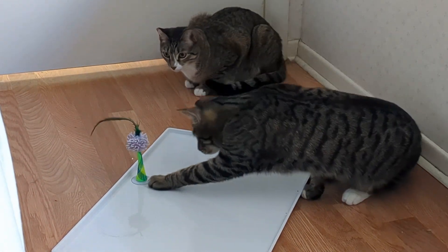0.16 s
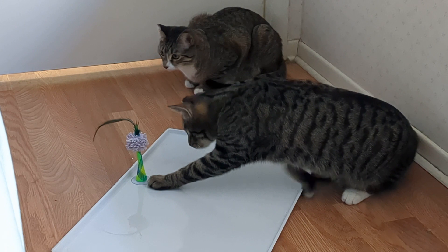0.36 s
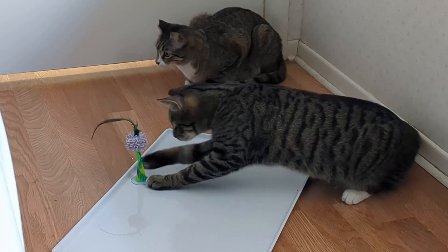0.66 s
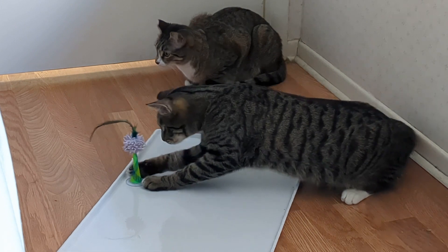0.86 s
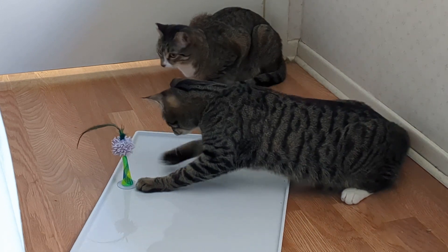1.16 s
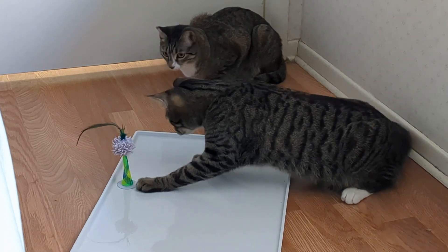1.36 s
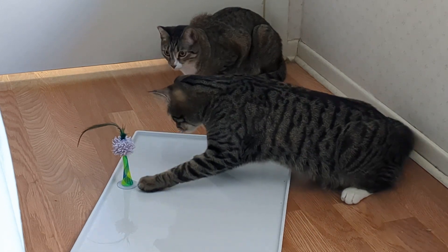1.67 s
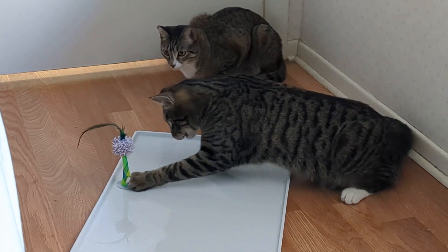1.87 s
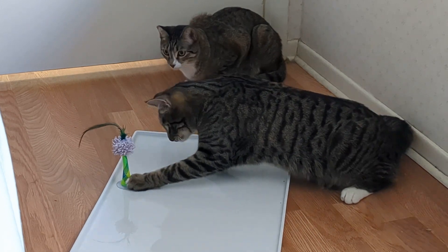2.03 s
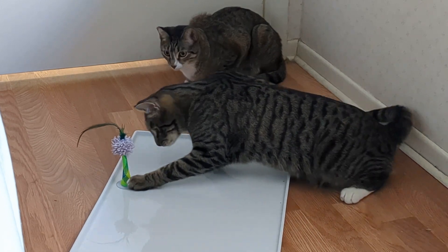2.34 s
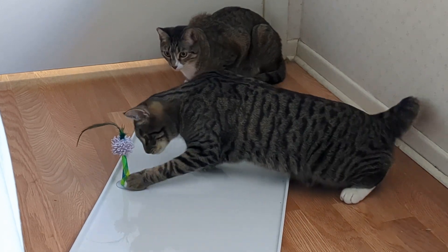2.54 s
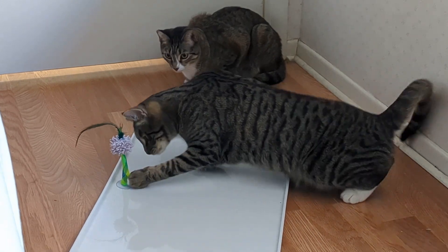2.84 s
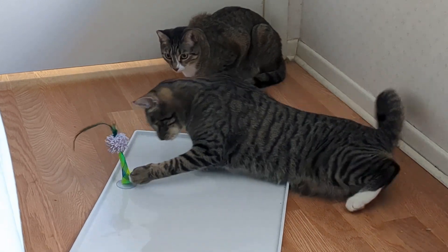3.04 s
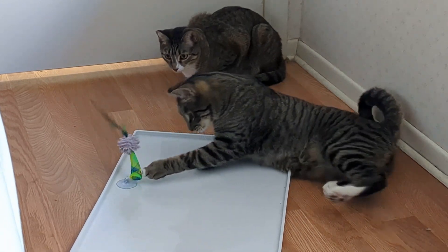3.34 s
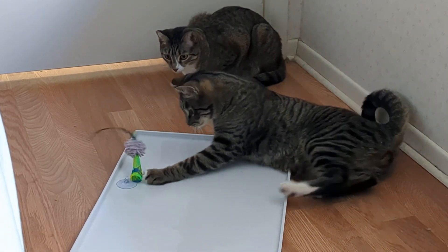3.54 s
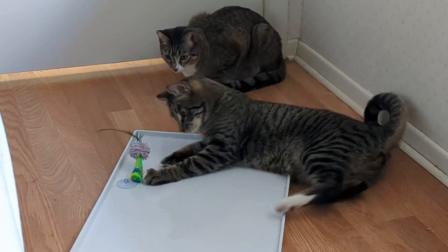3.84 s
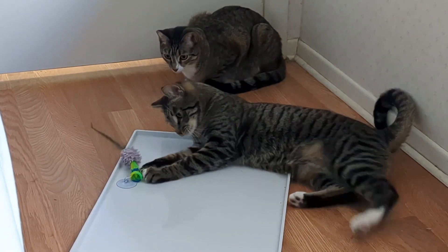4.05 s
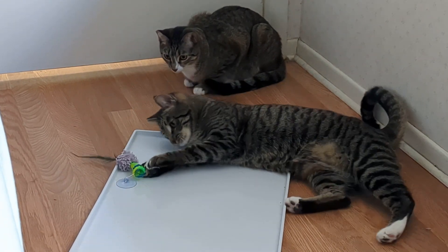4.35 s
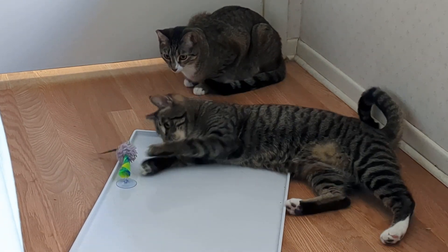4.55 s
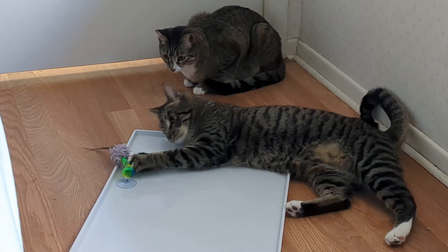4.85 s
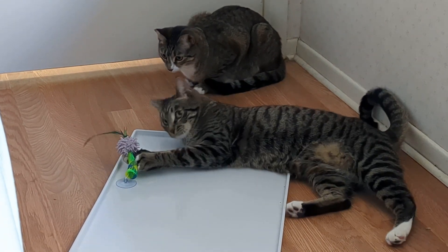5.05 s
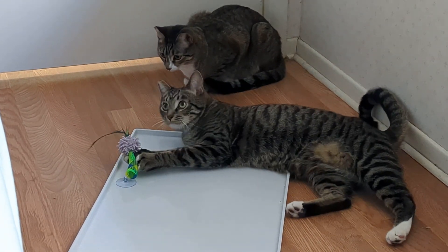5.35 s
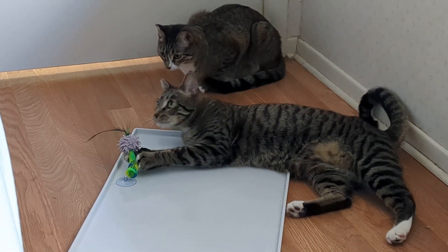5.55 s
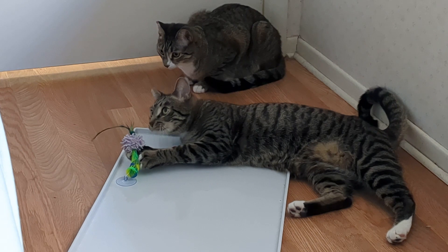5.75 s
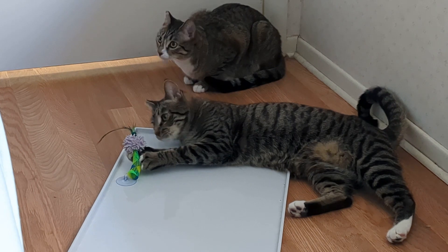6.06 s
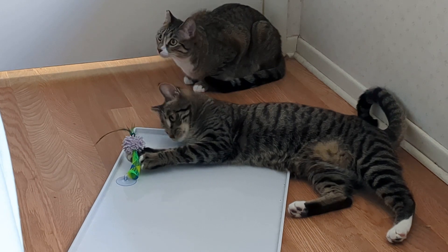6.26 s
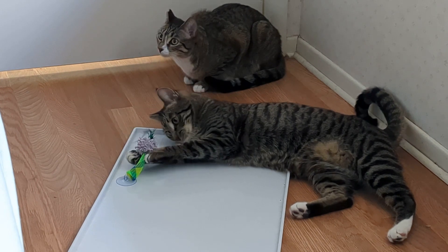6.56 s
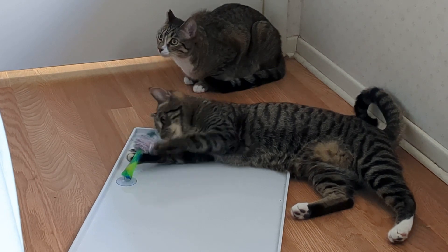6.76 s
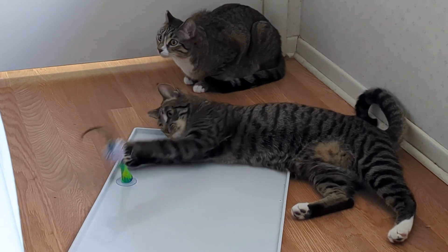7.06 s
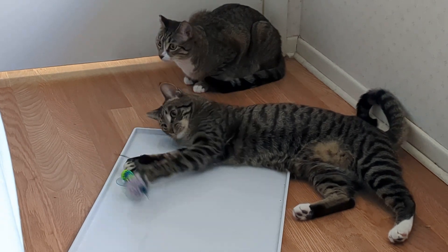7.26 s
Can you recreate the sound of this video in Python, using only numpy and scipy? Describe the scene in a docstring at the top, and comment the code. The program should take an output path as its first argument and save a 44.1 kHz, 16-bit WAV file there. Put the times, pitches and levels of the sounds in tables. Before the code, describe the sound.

Steady low room rumble with a very faint hiss runs throughout, picked up close in stereo in a small hard room. From 0.1 to 0.4 s a paw scratches lightly over thin plastic with a faint low squeal gliding upward; a second, grittier drag lasts from 0.6 to 1.25 s, with a tick and tiny ping near 1.0. Swipes and ticks at 1.4 and 1.66 lead to a crisp, modest snap at 1.72 over a soft deep thud. A faint rustle swells around 2.1. At 3.02-3.22 s claw ticks, swipes and dull bumps cluster with faint fur brushing, then the toy snaps three times almost as one at 3.34, loudest of all, briefly ringing the tray. Small ticks continue to 4.0, faint patter at 4.2, a soft bump at 4.45. Rustles swell softly near 3.75 and 4.75. Sparse dull touches follow at 5.36, 5.9, 6.4, 6.8 and barely at 7.27.

```python
"""A cat plays with a springy toy on a plastic tray in a small, hard-walled room, with rumble and hiss throughout.
First a paw drags over the tray twice (tiny slips, shaped noise) with a faint squeal (a gliding sine) at the start.
Then a deep thud swells (a sine) and the toy snaps (a noise crack and ringing tray); later it snaps three times fast.
Ticks, swipes (short noise), bumps (soft noise and tray flex) and stem pings (dying sines) run through the play.
Three soft rustles swell (smooth noise), fur brushes the tray (grains), and the last light touches thin out."""
import sys
import numpy as np
from scipy import signal
from scipy.fft import rfft, irfft
from scipy.io import wavfile
from scipy.ndimage import uniform_filter1d

SR = 44100
rng = np.random.default_rng(int(sys.argv[2]) if len(sys.argv) > 2 else 0)


def materialize(psi):
    """Save the field psi as 16-bit PCM at rate SR to the path in sys.argv[1].

    A 1-D psi becomes a single channel; in a 2-D psi each row is a channel.
    """
    bounded = np.clip(np.atleast_2d(psi).T, -1, 1)
    quanta = np.round(bounded * 32767).astype(np.int16)
    wavfile.write(sys.argv[1], SR, quanta)


N = 326600
TIME = np.arange(N) / SR


def from_db(db):
    """Turn decibels into a gain."""
    return 10 ** (np.asarray(db) / 20)


def rms_one(x):
    """Scale a sound to unit power."""
    return x / np.sqrt(np.mean(x ** 2) + 1e-30)


def in_time(rows):
    """Draw each column of a curve as a value at every sample."""
    s, *columns = np.transpose(rows)
    return [np.interp(TIME, s, column) for column in columns]


def during(rows):
    """One while a curve lasts, zero outside, with 20 ms ramps at the ends."""
    since_start = TIME - rows[0][0]
    until_end = rows[-1][0] - TIME
    return np.clip(np.minimum(since_start, until_end) / 0.02, 0, 1)


def rise_and_fade(peak_s, rise_db_per_s, fade_db_per_s):
    """A level in dB that climbs to zero and sinks again."""
    return np.minimum((TIME - peak_s) * rise_db_per_s, (peak_s - TIME) * fade_db_per_s)


def at_hz(points, hz):
    """Read a curve between its points on a log-frequency axis."""
    f, value = np.transpose(points)
    return np.interp(np.log(hz + 1e-9), np.log(f), value)


def colour(x, points, size=2048):
    """Filter with the given (f/Hz, level/dB) curve, causally (minimum phase, so nothing sounds early)."""
    gain = from_db(at_hz(points, np.fft.rfftfreq(size, 1 / SR)))
    cepstrum = irfft(np.log(gain))
    # fold the cepstrum onto positive time: this makes the phase minimal
    cepstrum[1:size // 2] *= 2
    cepstrum[size // 2 + 1:] = 0
    response = irfft(np.exp(rfft(cepstrum)))
    return signal.oaconvolve(x, response)[:N]


def noise(points):
    """Steady noise of a given colour, unit power."""
    return rms_one(colour(rng.standard_normal(N), points, size=8192))


def ring(x, hz, t60):
    """One vibration: a unit click starts a dying sine of height 1 (t60: seconds to fall 60 dB)."""
    r = np.exp(-np.log(1000) / (t60 * SR))
    w = 2 * np.pi * hz / SR
    return signal.lfilter([0, np.sin(w)], [1, -2 * r * np.cos(w), r * r], x + 1e-18)


def add(out, s, sound):
    """Mix a sound in at time s."""
    i = int(s * SR)
    out[i:i + len(sound)] += sound[:N - i]


def burst(t60, crack=0., rise_s=1e-5, size=6000, count=4):
    """A contact of unit energy: a sharp crack or a soft rise, then dying chatter with no pitch of its own."""
    t = np.arange(size) / SR
    chatter = np.exp(-np.log(1000) * t / max(t60, 1e-3)) * (1 - np.exp(-t / rise_s))
    envelope = chatter + crack * np.exp(-t / 0.00023)
    x = rng.standard_normal(size) * envelope
    for _ in range(count):  # even out the spectrum, then restore the decay
        x = irfft(np.exp(1j * np.angle(rfft(x))), size)
        x *= envelope / np.sqrt(np.abs(uniform_filter1d(x ** 2, size=24)) + 1e-12)
    return x / np.sqrt(np.sum(x ** 2))


def grains(per_s, spread_db):
    """Tiny stick-slip releases of uneven size at random moments, unit power."""
    sizes = from_db(spread_db * np.minimum(rng.exponential(1, N), 4))
    signs = rng.choice([-1, 1], N)
    happens = rng.random(N) < per_s / SR
    return rms_one(sizes * signs * happens)


def contacts(rows, body, gain_db, crack, rise_s):
    """Touches, each with its own brightness, sounding through the thin plastic."""
    out = np.zeros(N)
    for s, level_db, low_db, presence_db, treble_db, t60 in rows:
        brightness = [(2000, low_db), (4000, presence_db), (5000, presence_db), (9000, treble_db)]
        hit = colour(burst(t60, crack, rise_s), brightness)
        add(out, s, from_db(level_db + gain_db) * hit)
    return colour(out, body)


def touch(s, level_db, brightness_db, t60, presence_db):
    """A contact with a tipped spectrum: a claw tip favours the treble, a soft pad the low-mids."""
    return s, level_db, -brightness_db / 2, presence_db, brightness_db / 2, t60


# In the tables of touches and drags, level/dB is relative: each source adds its own gain.
# the toy snaps against the tray: [t/s, level/dB, low-mid level/dB, presence level/dB, treble level/dB, t60/s]
SNAPS = [(1.7236, -18, -6, -10, -14, 0.017), (3.336, -3, -12, -16, -20.5, 0.025),
         (3.3479, -5, -6.5, -11, -16.5, 0.01), (3.3614, -15.5, -23, -23.5, -14.5, 0.013)]
# thin plastic gives little bass: [f/Hz, level/dB]
SNAP_COLOUR = [(200, -34), (950, -19.5), (1280, -11), (1580, 1), (1930, 1.5), (2200, -1), (2500, 3.5),
               (3300, 3), (4800, 1), (5300, -5), (7000, -4.5), (9300, -1), (12500, -8), (16000, -7.5)]


def snaps():
    """The toy hits the tray: a sharp crack with short chatter."""
    return contacts(SNAPS, SNAP_COLOUR, gain_db=27, crack=0.77, rise_s=0.00021)


# how the tray rings when left free: [f/Hz, level/dB, t60/s before damping]
TRAY = [(1400, -16.5, 0.45), (1620, -4, 0.24), (1940, 1, 0.18), (2590, -9, 0.15), (3400, -5.5, 0.11),
        (3509, -19, 0.28), (4020, -3, 0.14), (4230, 3, 0.19), (4730, -6, 0.4), (5030, -12, 0.26),
        (5400, -18.5, 0.24), (5800, -2.5, 0.074), (5860, -11.5, 0.23), (6030, -17.5, 0.26),
        (6520, -6.5, 0.2), (6530, -12.5, 0.19), (7800, -12.5, 0.16), (7330, -15.5, 0.19),
        (9340, -19.5, 0.37), (9300, -19, 0.16)]


def tray(ring_db, damping):
    """Each snap sets the tray's vibrations ringing; the cat's weight makes them die sooner."""
    kicks = np.zeros(N)
    for s, level_db, *_ in SNAPS:
        add(kicks, s, from_db([level_db + ring_db]))
    out = 0
    for k, (hz, db, t60) in enumerate(TRAY):
        sign = (-1) ** k
        out = out + sign * from_db(db) * ring(kicks, hz, t60 / damping)
    return out


# faint, dull taps while the paw holds the toy down
PATTER_START_S, PATTER_GAP_S = 4.202, 0.042
PATTER_DB, PATTER_BRIGHTNESS_DB = -59.5, -15


def patter(spread_db, count=4):
    """A run of faint taps, uneven in time and strength, as rows of (t/s, level/dB, brightness/dB)."""
    rows = []
    for k, (late, strong) in enumerate(rng.uniform(-1, 1, (count, 2))):
        s = PATTER_START_S + PATTER_GAP_S * (k + late / 10)
        rows.append((s, PATTER_DB + spread_db * strong, PATTER_BRIGHTNESS_DB))
    return rows


# claws tick on toy and tray: [t/s, level/dB, brightness/dB (treble against low-mids)]
TICKS = [(0.175, -53, -13), (0.5304, -53, 6), (0.9917, -43, -1), (1.3902, -44.5, 2), (1.5297, -58, -8.5),
         (1.6596, -46, -2), (1.8227, -47.5, -5), (3.022, -47, -7), (3.035, -39.5, -4.5),
         (3.0738, -42.5, -8), (3.1259, -45.5, -5.5), (3.1539, -51.5, 4), (3.1805, -37.5, 10),
         (3.2146, -34, 10.5), (3.51, -47.5, -7), (3.6087, -57.5, -3), (3.6498, -42.5, 2), (3.676, -47.5, 6),
         (3.7851, -46, 8.5), (3.829, -52.5, 6), (3.897, -52, 2), (3.9436, -51, -5.5), (4.0257, -56, 7),
         (4.53, -56, 2), (4.6444, -55.5, 0.5), (5.3563, -62.5, -15.5), (5.9055, -56, -17)]
# the tone of claw ticks on thin plastic, strongest around 3 kHz: [f/Hz, level/dB]
TICK_COLOUR = [(200, -27), (1000, -17.5), (1600, -6.5), (2100, -3), (2600, 3), (3200, 4), (4700, 0),
               (5600, -3.5), (9300, -1.5), (12500, -9.5), (16000, -12)]
TICK_T60_S = 0.018  # every claw chatters equally briefly


def ticks():
    """Hard claw tips strike the plastic: small cracks with very short chatter."""
    claws = [touch(*tick, TICK_T60_S, presence_db=4) for tick in [*TICKS, *patter(spread_db=2)]]
    return contacts(claws, TICK_COLOUR, gain_db=25, crack=0.87, rise_s=0.00027)


# some touches pluck the toy's stem: [t/s, level/dB, f/Hz]
PINGS = [(1.063, -34.5, 2890), (3.023, -32.5, 2760), (3.897, -48, 4900), (3.9434, -52, 2890),
         (5.3546, -46.5, 2493)]


def stem(gain_db, t60):
    """Each pluck pings briefly at a pitch that depends on where the paw holds the stem."""
    out = np.zeros(N)
    for s, level_db, hz in PINGS:
        add(out, s, from_db(level_db + gain_db) * ring(signal.unit_impulse(SR // 4), hz, t60))
    return out


# soft pads and the toy's foot bump the tray: [t/s, level/dB, f/Hz]
BUMPS = [(1.728, -50.5, 620), (3.03, -54.5, 700), (3.182, -39, 630), (3.215, -37, 758.8),
         (3.343, -36, 1099), (3.359, -35, 760), (3.65, -56, 755), (4.458, -48.5, 1190), (5.903, -45.5, 554),
         (6.409, -60, 560), (6.794, -52, 517.6), (7.27, -58, 480)]
# the dull tone of a bump: [f/Hz, level/dB]
BUMP_COLOUR = [(150, -23), (300, -5.5), (430, -2), (700, 2), (1000, -1), (1400, -2), (2200, -6),
               (5000, -33.5)]
# the whole tray flexes under a soft push: [f/Hz, level/dB, t60/s]
TRAY_FLEX = [(444, -1, 0.14), (539, 1, .07), (611.7, -1.5, 0.069), (1108, -7, 0.054)]


def bumps(gain_db, t60, focus_db, flex_db):
    """Soft, dull pushes on the tray, each strongest around its own pitch; they also make it flex."""
    out, kicks = np.zeros(N), np.zeros(N)
    for s, level_db, hz in BUMPS:
        focus = [(hz / 2, -focus_db), (hz, 0), (2 * hz, -focus_db)]
        push = colour(burst(t60, rise_s=0.001), focus)
        add(out, s, from_db(level_db + gain_db) * push)
        kick = colour(signal.unit_impulse(SR // 10), focus)
        add(kicks, s, from_db(level_db + flex_db) * kick)
    flex = sum(from_db(db) * ring(kicks, hz, decay) for hz, db, decay in TRAY_FLEX)
    return colour(out, BUMP_COLOUR) + flex


# short swipes of a paw: [t/s, level/dB, brightness/dB (treble against low-mids), t60/s]
SWIPES = [(0.464, -62, 7, 0.094), (0.5182, -55.5, 14, 0.15), (0.9947, -47.5, -8, 0.031),
          (1.3516, -53, 0.5, .09), (1.3897, -45.5, -2.5, .053), (1.6652, -46, -1, 0.21),
          (2.758, -71, 5, .053), (3.084, -46, -1, 0.031), (3.177, -36.5, -8, 0.075), (3.22, -41, -2, .07),
          (3.6377, -45.5, 7.5, 0.043), (4.1347, -60, -2, 0.082), (4.3718, -58.5, 19, 0.031),
          (4.452, -51, 11, 0.027), (5.6312, -68, -15.5, .053), (5.8684, -67.5, -2, .053),
          (5.9, -57.5, -11, .02), (6.301, -70.5, 0, .052), (6.4076, -62, -3.5, 0.045),
          (6.7706, -53.5, 9.5, 0.025)]
# the plastic under a swipe: [f/Hz, level/dB]
SWIPE_COLOUR = [(200, -23.5), (1000, -13), (1500, -1.5), (2000, 3.5), (2600, 6), (4500, -0.5), (5600, -4),
                (6600, 0.5), (7900, -9.5), (9300, -1.5), (12500, -10), (16000, -14.5)]


def swipes():
    """A paw brushes past: a burst of noise with a soft rise and no crack."""
    paws = [touch(*swipe, presence_db=1.5) for swipe in SWIPES]
    return contacts(paws, SWIPE_COLOUR, gain_db=28.5, crack=0, rise_s=0.004)


def uneven(depth_db, span_s):
    """The gain of a paw that catches and slips: a smooth random wobble."""
    window = np.hanning(int(span_s * SR))
    wobble = signal.oaconvolve(rng.standard_normal(N), window, "same")
    return from_db(depth_db * rms_one(wobble))


# a paw drags over the tray twice, one curve each: [t/s, claw scratch level/dB, pad rub level/dB]
DRAG = [
    [(0.11, -78, -86), (0.2, -53, -75), (0.24, -69, -82), (0.278, -49.5, -93), (0.34, -61, -82),
     (0.42, -106, -88)],
    [(0.6, -66, -81), (0.67, -50.5, -82), (0.73, -55.5, -76), (0.78, -49, -69.5), (0.93, -56.5, -56.5),
     (1.04, -59, -70.5), (1.085, -53.5, -59.5), (1.135, -59.5, -73), (1.27, -67, -74)],
]
# the tone of scratching claws or fur: [f/Hz, level/dB]
SCRATCH_COLOUR = [(1350, -28), (2300, -13.5), (2790, -5), (3340, -3.5), (4330, -0.5), (5480, -3.5),
                  (6450, -3), (7960, -10.5), (8920, -3.5), (15100, -18.5), (16000, -23.5)]
# the tone of a gripping paw: [f/Hz, level/dB]
GRIP_COLOUR = [(900, -32), (1400, -12), (1900, -5.5), (2500, -0.5), (3000, -2.5), (4500, -19)]
# the tone of a rubbing pad: [f/Hz, level/dB]
PAD_COLOUR = [(300, -16), (480, 2), (650, 3.5), (800, 1), (950, -20), (1200, 1.5), (1600, -12), (3000, -40)]
GRIP_FOLLOWS_PAD = 0.55  # share of the grip's dB level set by the pad's pressure, the rest by the claws


def drag(scratch_gain_db, grip_gain_db, pad_gain_db):
    """Claws scratch in fine grains; a pressed paw grips in coarser slips and its pad rubs low."""
    scratch = rms_one(colour(grains(per_s=9800, spread_db=2), SCRATCH_COLOUR))
    grip = rms_one(colour(grains(per_s=3000, spread_db=2), GRIP_COLOUR))
    pad = rms_one(colour(grains(per_s=1500, spread_db=1.5), PAD_COLOUR))
    out = 0
    for stroke in DRAG:
        scratch_db, pad_db = in_time(stroke)
        grip_db = scratch_db + GRIP_FOLLOWS_PAD * (pad_db - scratch_db)
        claws = from_db(scratch_db + scratch_gain_db) * scratch
        gripping = from_db(grip_db + grip_gain_db) * grip
        rubbing = from_db(pad_db + pad_gain_db) * pad
        out = out + during(stroke) * (claws + gripping + rubbing)
    return out * uneven(depth_db=5, span_s=0.0065)


# fur brushes the tray as the cat flops down, then fades as it settles
FLOP_S, SETTLED_S = 3.03, 5.45
FUR_DB, FUR_REST_DB = -64, -90
FUR_RISE_DB_PER_S, FUR_FADE_DB_PER_S = 203, 16.5


def fur():
    """A faint, grainy rustle that dies down, over a fainter trace that lasts until the cat has settled."""
    level = from_db(FUR_DB + rise_and_fade(FLOP_S, FUR_RISE_DB_PER_S, FUR_FADE_DB_PER_S))
    level = level + from_db(FUR_REST_DB) * during([[FLOP_S], [SETTLED_S]])
    return level * rms_one(colour(grains(per_s=2500, spread_db=4.5), SCRATCH_COLOUR))


# a faint, pure squeal during the first drag
SQUEAL_START_S, SQUEAL_PEAK_S, SQUEAL_CLIMB_S, SQUEAL_END_S = 0.12, 0.21, 0.275, 0.56
SQUEAL_HZ, SQUEAL_DROP_HZ, SQUEAL_DROP_S, SQUEAL_CLIMB_HZ_PER_S = 451, 65, 0.0205, 245
SQUEAL_DB, SQUEAL_RISE_DB_PER_S, SQUEAL_FADE_DB_PER_S = -62, 172, 48


def squeal():
    """One soft sine whose pitch drops to a low note, holds, then climbs."""
    drop = SQUEAL_DROP_HZ * np.exp(-np.maximum(TIME - SQUEAL_START_S, 0) / SQUEAL_DROP_S)
    climb = SQUEAL_CLIMB_HZ_PER_S * np.maximum(TIME - SQUEAL_CLIMB_S, 0)
    hz = SQUEAL_HZ + drop + climb
    tone = np.sqrt(2) * np.sin(2 * np.pi * np.cumsum(hz) / SR)
    level = from_db(SQUEAL_DB + rise_and_fade(SQUEAL_PEAK_S, SQUEAL_RISE_DB_PER_S, SQUEAL_FADE_DB_PER_S))
    return level * during([[SQUEAL_START_S], [SQUEAL_END_S]]) * tone


def floor_thud(start_s, length_s, hz, level_db):
    """A deep, soft swell from the floor as the cat shifts its weight: a sine that rises and sinks."""
    out, t = np.zeros(N), np.arange(int(length_s * SR)) / SR
    swell = np.hanning(len(t)) * np.sin(2 * np.pi * hz * t)
    add(out, start_s, from_db(level_db) * swell)
    return out


# the cat shifts its weight: [middle t/s, time from the middle until 8.7 dB down t/s, level/dB]
SHIFTS = [(2.1, 0.43, -76.5), (3.747, 0.53, -70.5), (4.75, 0.35, -74.5)]
# the dull tone of the rustle: [f/Hz, level/dB]
SHIFT_COLOUR = [(400, -9.5), (700, -2), (1900, -2), (3000, -11), (7000, -19), (14000, -34)]


def shifting():
    """Soft rustles that swell and sink smoothly, with separate noise on each side."""
    level = sum(from_db(db) * np.exp(-((TIME - s) / half_s) ** 2) for s, half_s, db in SHIFTS)
    return level * np.array([noise(SHIFT_COLOUR), noise(SHIFT_COLOUR)])


# how long the reflections last: [f/Hz, t60/s]
ROOM_T60 = [(300, 0.49), (800, 0.1), (1600, 0.31), (3000, 0.22), (6000, 0.26), (10000, 0.22), (16000, 0.3)]
# how strong they are against the dry sound: [f/Hz, level/dB]
ROOM_LEVEL = [(300, 6.5), (800, 3.5), (1600, 4), (3000, 2.5), (6000, 2), (10000, 4), (16000, -4)]


def room_tail(build_s, size=22050):
    """Dense reflections, made of noise, that build up quickly and die band by band."""
    t, hz = np.arange(size) / SR, np.fft.rfftfreq(size, 1 / SR)
    white, out = rfft(rng.standard_normal(size)), 0
    edges = np.geomspace(150, 19200, 15)
    for low, high in zip(edges, edges[1:]):
        centre = np.sqrt(low * high)
        band = irfft(white * ((hz >= low) & (hz < high)), size)
        band *= np.exp(-np.log(1000) * t / at_hz(ROOM_T60, centre)) * (1 - np.exp(-t / build_s))
        to_unit = np.sqrt(2 * (high - low) / SR / np.sum(band ** 2))  # gives every band its fair share of energy
        out = out + from_db(at_hz(ROOM_LEVEL, centre)) * band * to_unit
    return out


# how much the two sides differ, for reflections and for the rumble: [f/Hz, level/dB]
WIDTH = [(30, -20.5), (100, -16), (200, -16.5), (350, -11), (550, -5.5), (800, -4.5), (1100, -0.5)]
# left side against right side: [f/Hz, level/dB]
LEFT_LEAD = [(300, 0.5), (800, -3.5), (1300, -3.5), (2300, -5), (4400, 4.5), (8000, 3.5), (15000, 0.5)]
RIGHT_DELAY_S = 0.00014


def room(x, direct_db, direct_pan_db):
    """Direct sound comes to the left first and stronger; reflections differ by side only above the bass."""
    mid, side = (signal.oaconvolve(x, room_tail(build_s=0.00067))[:N] / np.sqrt(2) for _ in range(2))
    side = colour(side, WIDTH)
    late = np.roll(x, round(RIGHT_DELAY_S * SR))
    left = from_db(direct_db + direct_pan_db / 2) * x + mid + side
    right = from_db(direct_db - direct_pan_db / 2) * late + mid - side
    left_tone = [(hz, db / 2) for hz, db in LEFT_LEAD]
    right_tone = [(hz, -db / 2) for hz, db in LEFT_LEAD]
    return np.array([colour(left, left_tone), colour(right, right_tone)])


# the tone of the low rumble: [f/Hz, level/dB]
RUMBLE = [(16, -43), (28, -18.5), (41, -2.5), (59, 0.5), (130, -5.5), (161, -4.5), (194, -13), (223, -9.5),
          (285, -13), (348, -18.5), (438, -31.5), (568, -26.5), (694, -35), (797, -40.5), (1100, -55.5),
          (1430, -78.5), (2420, -120)]
# air resonances, kept sounding by noise: [f/Hz, level/dB, t60/s]
DRONES = [(168.6, -60.5, .2), (215.3, -61.5, 0.13), (570, -79.5, 0.049), (783, -85, 0.21), (1456, -94, .1),
          (2480, -89.5, 0.07), (8850, -96, 0.012)]


def rumble(level_db):
    """Low noise plus narrow resonances that hum."""
    resonances = sum(from_db(db) * rms_one(ring(rng.standard_normal(N), hz, t60)) for hz, db, t60 in DRONES)
    return from_db(level_db) * noise(RUMBLE) + resonances


# the tone of the faint hiss: [f/Hz, level/dB]
HISS = [(530, -35.5), (900, -2.5), (1090, -10), (1220, -5), (1470, -9), (1590, -12), (1810, -2.5),
        (2070, -5.5), (2390, -3.5), (3260, -4.5), (4410, -7), (5550, -13), (8150, -18), (8870, -20.5),
        (16000, -31)]


def air(rumble_db, hiss_db, pan_db):
    """The rumble is nearly alike on both sides, the hiss is not."""
    shared = rumble(rumble_db)
    difference = colour(rumble(rumble_db), WIDTH, size=8192) * np.array([[1], [-1]])
    hiss = from_db(hiss_db) * np.array([noise(HISS), noise(HISS)])
    return (shared + difference) * from_db([[pan_db / 2], [-pan_db / 2]]) + hiss


def scene():
    """Blows and rubbing sound in the room; the thud, rustles, squeal and steady air are added as they are."""
    blows = snaps() + tray(ring_db=-29, damping=1.8) + ticks() + stem(gain_db=-6, t60=0.039)
    blows = blows + bumps(gain_db=31.5, t60=0.088, focus_db=12, flex_db=-11)
    rubbing = swipes() + drag(scratch_gain_db=-2, grip_gain_db=-1, pad_gain_db=-6) + fur()
    heard = room(blows, direct_db=-2, direct_pan_db=11.5) + room(rubbing, direct_db=-3, direct_pan_db=4.5)
    thud = floor_thud(start_s=1.58, length_s=0.25, hz=44.4, level_db=-44.5)
    return heard + thud + shifting() + squeal() + air(rumble_db=-54.23, hiss_db=-76.64, pan_db=0.65)


CUTOFF_HZ = 16000


def record(dry):
    """The highest peaks are rounded, then the top is cut steeply."""
    rounded = np.tanh(dry)
    return signal.sosfilt(signal.ellip(12, 0.1, 100, CUTOFF_HZ, fs=SR, output="sos"), rounded)


dry = scene()
out = record(dry)
materialize(out)
```